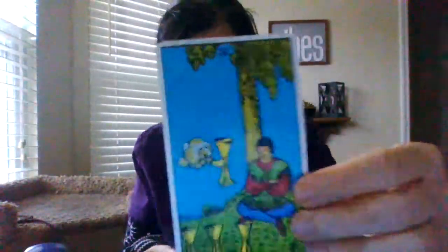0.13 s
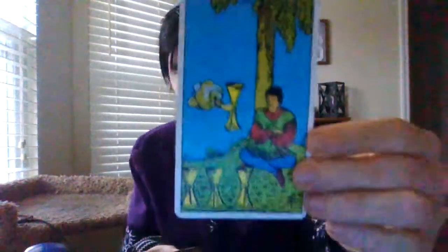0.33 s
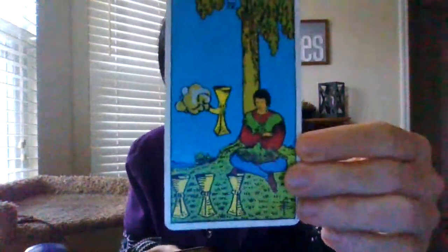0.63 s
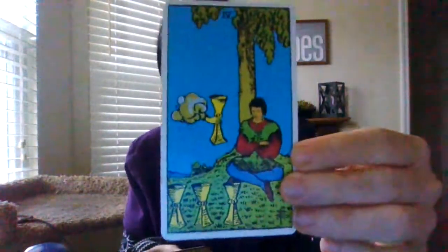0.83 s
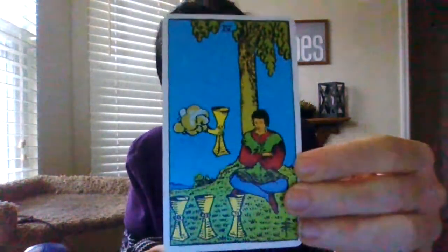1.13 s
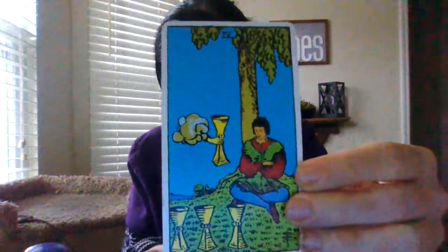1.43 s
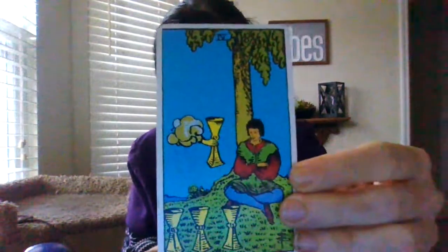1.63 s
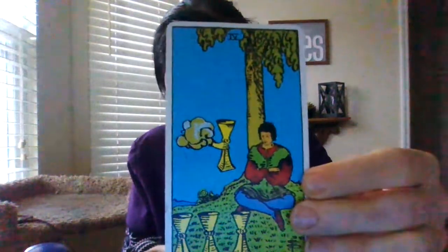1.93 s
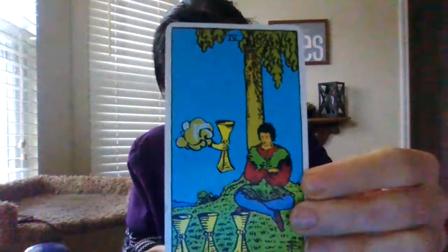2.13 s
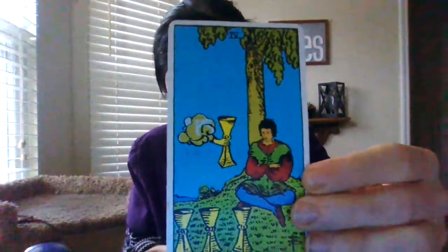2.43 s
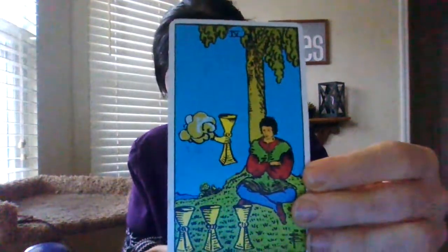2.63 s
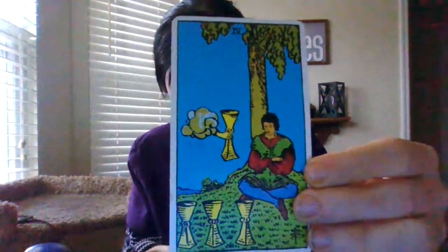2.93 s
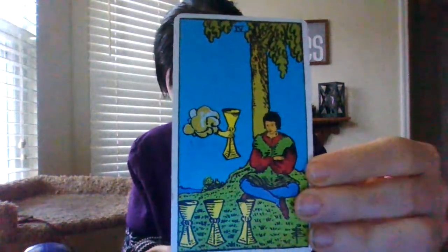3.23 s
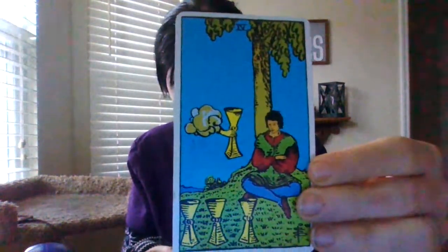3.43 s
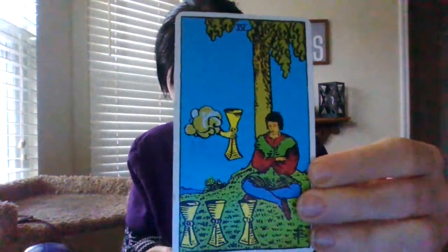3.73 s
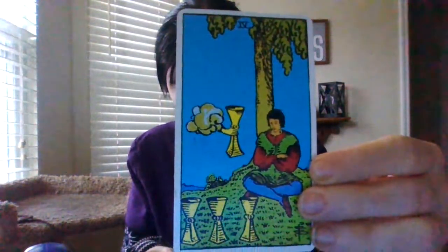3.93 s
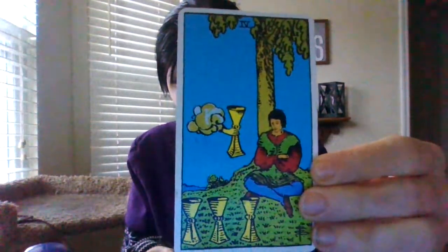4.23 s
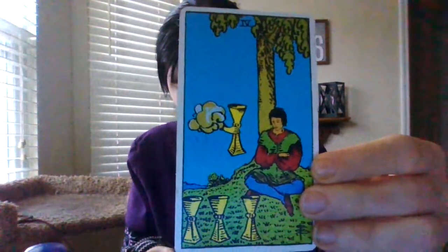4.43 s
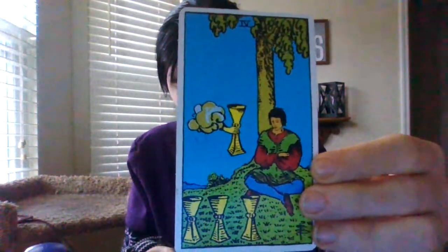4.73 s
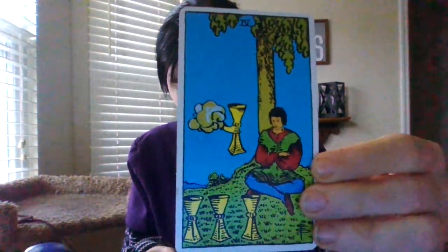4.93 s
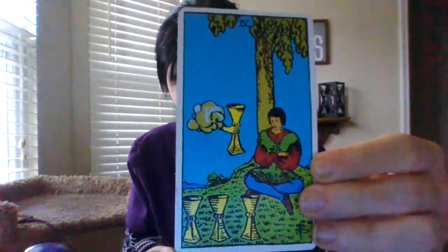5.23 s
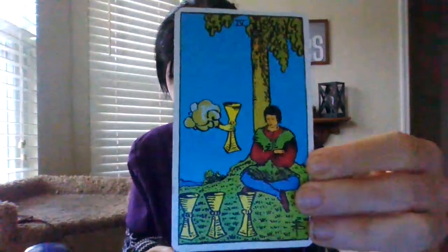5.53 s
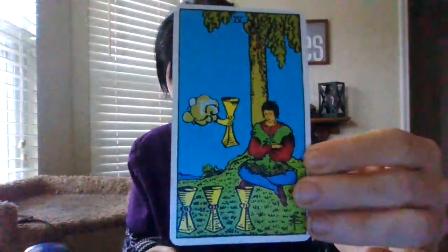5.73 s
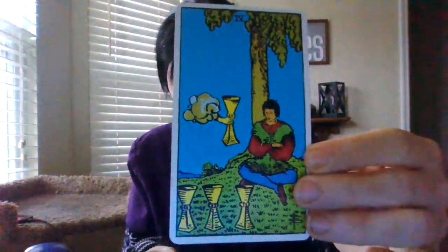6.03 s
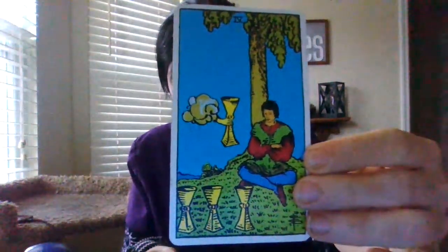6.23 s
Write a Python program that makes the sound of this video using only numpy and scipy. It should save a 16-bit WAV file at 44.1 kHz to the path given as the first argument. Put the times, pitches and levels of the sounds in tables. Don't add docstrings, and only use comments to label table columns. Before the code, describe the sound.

A quiet indoor room heard by a laptop's built-in stereo microphones. From 0 s a vehicle outside is loud and low; around 0.2-0.3 s its pitch falls sharply as it shifts gear, then it pulls away with a slightly shuddering, muffled drone that climbs slowly. Soft tyre hiss and deep thrum are strongest around 1.3-1.9 s and fade by 4 s. Close up, a card taps at 0.1 s, then creaks, rustles and snaps between 0.26 and 0.55 s, with small clicks near 1.0, 1.85, 2.35, 3.1 and 6.04 s. The throttle eases around 2.5-3.5 s, the engine swells again near 4.7 s, rises until 5.4 s, and drops away about 6 s. Throughout, a fan hums with a slow deep air wobble, a disk head makes irregular tiny bright ticks and short rattles, and faint electronic whine and fluttering hiss remain until the end at about 6.4 s.

```python
import sys
import numpy as np
from scipy import signal
from scipy.fft import rfft, irfft, next_fast_len
from scipy.io import wavfile
from scipy.ndimage import uniform_filter1d

SR = 44100
rng = np.random.default_rng(int(sys.argv[2]) if len(sys.argv) > 2 else 0)


def bounce(signal):
    frames = np.transpose(np.atleast_2d(signal))
    limited = np.clip(frames, -1, 1)
    pcm = np.round(limited * 32767).astype(np.int16)
    wavfile.write(sys.argv[1], SR, pcm)


def gain_from_db(level_db):
    decades = np.asarray(level_db, float) / 20
    return 10 ** decades


N = 280784
TIME_S = np.arange(N) / SR
OPPOSED = np.array([[1], [-1]])


def read(points, hz):
    f, value = np.transpose(points)
    return np.interp(np.log(hz + 1), np.log(f + 1), value)


def evened(x):
    return x / np.sqrt(np.mean(x ** 2) + 1e-20)


def curves(rows):
    s, *columns = np.transpose(rows)
    return [np.interp(TIME_S, s, column) for column in columns]


def tone(hz):
    cycles = np.cumsum(hz * np.ones(N)) / SR
    return np.sqrt(2) * np.sin(2 * np.pi * (cycles + rng.random()))


def resonate(x, hz, width_hz):
    turn = np.exp(2j * np.pi * np.cumsum(hz * np.ones(len(x))) / SR)
    r = np.exp(-np.pi * width_hz / SR)
    smooth = signal.lfilter([(1 - r) ** 2], [1, -2 * r, r * r], x / turn)
    return 2 * (turn * smooth).real


def noise(spectrum, likeness, lag=0):
    size = next_fast_len(N)
    hz = np.fft.rfftfreq(size, 1 / SR)
    a, b = rfft(rng.standard_normal((2, size)))
    same = np.clip(read(likeness, hz), -1, 1)
    left = a * np.exp(-2j * np.pi * hz * lag / SR)
    right = same * a + np.sqrt(1 - same ** 2) * b
    return irfft(np.array([left, right]) * gain_from_db(read(spectrum, hz)) * np.sqrt(SR / 2), size)[:, :N]


def add(mix, s, sound):
    part = mix[..., round(s * SR):][..., :sound.shape[-1]]
    part += sound[..., :part.shape[-1]]


# pitch_hz, width_hz, level_db
WALL_MODES = [(40.3, 4, -36.5), (44.7, 3, -30.5), (49.1, 3.6, -30), (59.46, 1.69, -39), (79.7, 14.6, -37.5),
              (91.9, 5.3, -37), (99.7, 2.9, -45), (104.8, 3.6, -52.5), (111.12, 5.66, -41.5),
              (126.5, 11.5, -48.5), (134.7, 6.3, -37.5), (151.1, 5, -44), (168, 13.6, -59.5), (118, 6, -48),
              (189, 10.7, -54), (259.4, 9.6, -58), (328.4, 11, -59)]


def walls_db(hz):
    power = sum(gain_from_db(2 * db) / (1 + (2 * (hz - f) / width) ** 2) ** 2 for f, width, db in WALL_MODES)
    return 10 * np.log10(power)


# time_s, firing_hz, load_db
ENGINE_RUN = [(0, 59.4, 9.5), (.13, 61.4, 7.5), (.22, 53.14, -8.5), (.3, 38.45, -2), (.57, 40.92, 3),
              (1.07, 44.79, -3.5), (1.57, 48.55, 4), (2.07, 51.11, 5), (2.5, 53.2, 4), (2.8, 53.69, 3),
              (3.5, 53.5, 0.5), (4.2, 55.37, 0), (4.7, 56.9, 6.5), (5.4, 60.3, -1), (5.75, 56.75, -1.5),
              (6.0, 51.86, -10), (6.12, 43.88, -10), (6.37, 44.75, -9)]
# multiple of firing, level_db, change_db while coasting, share of load_db followed
STRONG_ORDERS = [(1, -1.75, 1, 1.1), (2, 1.8, -7.5, 1.08), (2.5, -12.5, 4.5, 0.48), (3, 4, 2.5, 0.6),
                 (4, -1, 0, 1.5), (5, -2, 0, 0.5), (6.5, -2, -13, 1)]
# multiple of firing, level_db
WEAK_ORDERS = [(.5, -13.5), (1.5, -24), (3.5, -36)]
# from_s, to_s, ramp_s
COASTING = (2.46, 3.49, 0.091)
# start_s, rate_hz, share of speed, fade_s
DRIVELINE_SHUDDER = (0.33, 3.9, 0.039, 1.8)
# pitch_hz, level_db
RUMBLE_SPECTRUM = [(30, 10.5), (80, 4), (115, -0.5), (150, 6), (190, 1), (215, -1), (300, -25),
                   (450, -26.5), (1200, -23.5), (4000, -73)]
# pitch_hz, likeness 0-1
ROOM_LIKENESS = [(60, 0.95), (150, 0.99), (380, 0.95), (950, 0.85), (1500, 0.57), (2380, 0.012),
                 (5980, 0.55), (15000, 1)]


def engine(lug_hz=43, even_rough=.05, lug_rough=0.14, rumble_db=-24, side_db=-8, ringing_db=-3):
    hz, load_db = curves(ENGINE_RUN)
    ease, resume, ramp = COASTING
    coasting = np.interp(TIME_S, [ease - ramp, ease + ramp, resume - ramp, resume + ramp], [0, 1, 1, 0])
    levels_db = []
    for multiple, db, coast_db, follows in STRONG_ORDERS:
        through_db = np.repeat(walls_db(multiple * hz[::32]), 32)[:N]
        levels_db.append(follows * load_db + db + coasting * coast_db + through_db)
    load = np.sqrt(uniform_filter1d(sum(gain_from_db(2 * db) for db in levels_db), 20000))
    gains = [gain_from_db(db) for db in levels_db] + [load * gain_from_db(db) for _, db in WEAK_ORDERS]
    multiples = [row[0] for row in list(STRONG_ORDERS) + list(WEAK_ORDERS)]

    start, shudder_hz, share, fade = DRIVELINE_SHUDDER
    since = np.maximum(TIME_S - start, 0)
    hz = hz * (1 + share * np.sin(2 * np.pi * shudder_hz * since) * np.exp(-since / fade))
    shake = even_rough + lug_rough * (uniform_filter1d(hz, 4000) < lug_hz)
    orders = np.zeros(N)
    for multiple, gain in zip(multiples, gains):
        uneven = 1 + shake * evened(uniform_filter1d(rng.standard_normal(N), 1500))
        orders += gain * tone(multiple * hz) * uneven

    rumble = gain_from_db(rumble_db) * load ** 0.59 * evened(noise(RUMBLE_SPECTRUM, ROOM_LIKENESS))
    across = gain_from_db(side_db) * resonate(orders, 95.3, 7.0)
    ringing = gain_from_db(ringing_db) * resonate(orders, 59.3, 1.34)
    return orders + ringing + rumble + across * OPPOSED


# pitch_hz, density_db per Hz
TYRE_HISS = [(190, -100), (290, -80.5), (450, -97), (700, -88.5), (1300, -100.5), (2100, -102),
             (3000, -106), (5000, -122)]
# time_s, level_db
NEARNESS = [
    (0, -11),
    (.8, -10.5),
    (1.3, -1),
    (1.9, -3.5),
    (2.6, -7.5),
    (4, -24),
    (6.37, -17),
]


def tyres(thrum_db=-42, thrum_hz=34, width_hz=22):
    near_db, = curves(NEARNESS)
    thrum = gain_from_db(thrum_db) * evened(resonate(rng.standard_normal(N), thrum_hz, width_hz))
    return gain_from_db(near_db) * (noise(TYRE_HISS, ROOM_LIKENESS, lag=3) + thrum)


# start_s, peak_db, low_hz, high_hz
CARD_SNAPS = [(.2735, -56, 1200, 5000), (.279, -56, 900, 3000), (.2965, -54, 1200, 4800),
              (.3972, -41, 3400, 8500), (.3982, -39, 8500, 15500), (1.8485, -45.5, 4300, 8200),
              (1.8485, -50, 13000, 15500), (2.34, -54, 3800, 5200), (2.3395, -50, 1500, 3000),
              (2.3695, -45, 1300, 3300), (3.155, -49, 2900, 4300), (3.0755, -57, 3200, 4300),
              (6.041, -48, 1300, 3000)]


def snaps():
    out = np.zeros(N)
    kick = np.zeros(512)
    kick[[0, 31]] = 1, -.45
    for s, db, low_hz, high_hz in CARD_SNAPS:
        band = signal.butter(2, [low_hz, high_hz], "band", fs=SR, output="sos")
        click = signal.sosfilt(band, kick)
        add(out, s, gain_from_db(db) * click / abs(click).max())
    return out


# start_s, length_s, level_db
FINGER_SLIDE = (.262, .04, -62.5)
# pitch_hz, level_db
SLIDE_BODY = [(600, -30), (1000, 0), (2600, 0), (4500, -8), (8000, -13), (12000, -30)]


def rustle(out):
    start, length, db = FINGER_SLIDE
    size = round(length * SR)
    grain_gain = gain_from_db(4.0 * rng.standard_normal(40).repeat(66))[:size]
    grains = noise(SLIDE_BODY, ROOM_LIKENESS)[0, :size] * grain_gain
    add(out, start, gain_from_db(db) * evened(grains) * signal.windows.tukey(len(grains), .4))


# start_s, peak_db, pitch_hz, t60_s
CARD_TAPS = [(.1025, -45, 1540, .04), (.112, -59, 1470, .3), (.263, -53.5, 1060, .2),
             (.271, -57, 1850, .06), (.272, -58, 2400, .08), (.273, -59, 4400, .07), (.275, -61, 3150, .1),
             (.276, -64, 6900, .1), (.281, -65, 5600, .08), (.289, -60, 2380, .05), (.294, -61, 4350, .04),
             (.3972, -54, 5600, .02), (.3972, -52, 6500, .02), (.397, -43.5, 7400, .035),
             (.4035, -54, 7150, .04), (.45, -56, 1110, .13), (.454, -56, 1840, .08), (.462, -59, 1400, .15),
             (.467, -54, 1830, .08), (.484, -56, 1900, .065), (.515, -57, 1840, .08),
             (.533, -59, 1860, .07), (.728, -59, 1897, .032), (1.0105, -48, 1130, .06),
             (1.8495, -57, 5000, .012), (2.3392, -50, 2450, .016), (2.3392, -51, 1950, .016),
             (2.345, -60, 2527, .18), (2.369, -46, 1904, .02), (2.369, -51, 2600, .02),
             (3.0744, -60, 3720, .031), (3.1547, -58, 3450, .025), (6.0408, -50, 1950, .015),
             (6.0408, -51, 1450, .016), (2.35, -62, 1900, .15)]


def card(rise_s=.0016, struck_s=.07, struck_top=0.7, struck_least=0.15):
    t = np.arange(8192) / SR
    rise = np.sin(np.pi / 2 * np.minimum(t / rise_s, 1)) ** 2
    out = snaps()
    for s, db, hz, t60 in CARD_TAPS:
        width_hz = 0.05 * hz + 120 + 6 / t60
        rubbed = evened(resonate(rng.standard_normal(len(t)), hz, width_hz))
        struck = np.clip(struck_least + struck_top / (1 + (t60 / struck_s) ** 6), 0, 1)
        ring = np.sqrt(2 * struck) * np.sin(2 * np.pi * hz * t) + np.sqrt(1 - struck) * rubbed
        add(out, s, 0.89 * ring * gain_from_db(db - 60 * t / t60) * rise)
    rustle(out)
    return np.array([np.roll(out, 1), out])


# start_s, peak_db, brightness_db
HEAD_TICKS = [(0.1496, -47.5, 6), (0.2433, -46.5, 7), (0.5891, -55, 7), (0.876, -44.5, 15.5),
              (0.9486, -44.5, 7.5), (1.1134, -43.5, 12), (1.282, -62, 1), (1.2958, -41.5, 12),
              (1.4247, -47, 8), (1.4511, -51, 1), (2.0438, -51, 6), (2.378, -46, 7), (2.6693, -47.5, 5.5),
              (2.8145, -48, 14.5), (2.8669, -44, 9), (3.006, -48, 8), (3.3643, -45, 6.5),
              (3.4092, -46.5, 1), (3.6421, -48, 7), (4.185, -46, 11), (4.3196, -44, 10),
              (4.4528, -43.5, 11.5), (4.569, -48, 11), (4.9979, -48, 7), (5.1618, -43, 8),
              (5.446, -50, 5.5), (5.7957, -46, 10), (6.1584, -50, 3), (6.342, -45, 7.5)]
MORE_TICKS = [(.0912, -52, 3), (.196, -51, 7), (.5142, -51, 2), (1.5065, -54, 3), (1.934, -46, 6),
              (2.18, -50, 5), (2.3615, -55, 5), (2.586, -50, 7.5), (2.7472, -47, 3), (3.033, -53, 5),
              (3.1512, -48.5, 5), (3.2605, -51, 8), (3.4935, -49, 10), (3.5848, -50, 6), (4.3435, -52, 5),
              (4.3745, -52, 15), (4.7701, -52.5, 3.5), (4.9821, -55, 8), (5.1851, -45, 14),
              (5.462, -42.5, 11), (5.7269, -54, 5), (5.9155, -55, 3), (6.2692, -51, 0)]
FURTHER_TICKS = [(.0338, -53, 9), (.2835, -48, 4), (.4449, -51, 1), (.5546, -50, 14), (.8829, -49, 7),
                 (.9797, -54, 6), (1.2421, -52, 9), (1.3813, -52, 7), (1.4805, -52, 4), (2.4745, -46, 13),
                 (2.558, -44, 4), (2.7227, -53, -4), (2.9736, -53, 7), (3.0584, -49, 7), (3.3243, -55, 12),
                 (3.8122, -55, 6), (4.0427, -53, 8), (4.2025, -55, 6), (4.3944, -50, 4), (4.6718, -52, 15),
                 (4.806, -53, 8), (5.0749, -53, 7), (5.3457, -56, 4), (5.4914, -53, 3), (5.5712, -48, 6),
                 (6.0277, -51, 5)]
# start_s, peak_db, brightness_db
HEAD_RATTLES = [(.0635, -51.5, 4.5), (0.8128, -56, 0), (1.0538, -52, 8), (1.139, -56, 7), (1.591, -54.5, 2),
                (1.7261, -54, 1), (1.923, -53, 8), (2.131, -51, 11), (2.4655, -59, 22), (2.5459, -52, 6),
                (2.74, -60.5, 8), (2.9037, -52.5, 4.5), (3.142, -52, 11), (4.334, -52, 12),
                (5.171, -45, 6.5), (5.8725, -52, 6.5), (6.252, -58, 0), (6.288, -54, 3)]
# pitch_hz, level_db
TICK_COLOUR = [(5000, -30), (7000, -12), (9000, 0), (12000, 0), (15500, -.5)]


def disk_ticks(seeks_per_s=3, faint_per_s=50, rattle_gap_s=0.002, rattle_fall_db=1.5):
    rattles = [(s + k * rattle_gap_s, db - k * rattle_fall_db, bright_db)
               for s, db, bright_db in HEAD_RATTLES for k in range(3)]
    seeks = [(s * 200 / seeks_per_s, -61.5 + 9.5 * u, 14 * v - 2) for s, u, v in rng.random((200, 3))]
    faint = [(s * 600 / faint_per_s, -66 + 0.51 * u, 16 * v - 5) for s, u, v in rng.random((600, 3))]
    ticks = list(HEAD_TICKS) + list(MORE_TICKS) + list(FURTHER_TICKS) + rattles + seeks + faint
    return [row for row in ticks if row[0] < N / SR]


def disk(rise_s=.0008, t60_s=0.0096, tail_db=-11, tail_t60_s=0.039, gain_db=3, spread=.55):
    t, hz = np.arange(2048) / SR, np.fft.rfftfreq(2048, 1 / SR)
    decay = gain_from_db(-60 * t / t60_s) + gain_from_db(tail_db - 60 * t / tail_t60_s)
    shape = decay * np.minimum(t / rise_s, 1)
    out = np.zeros((2, N))
    for s, db, bright_db in disk_ticks():
        tilt_db = (bright_db - 1.5) * np.clip((hz - 11500) / 4500, -1, 1)
        ripple_db = 3.8 * np.cos(hz / 700 + 2 * np.pi * rng.random())
        colour = gain_from_db(read(TICK_COLOUR, hz) + tilt_db + ripple_db)
        mid, side = irfft(rfft(rng.standard_normal((2, len(t)))) * evened(colour))
        add(out, s, gain_from_db(db + gain_db) * shape * (mid + spread * side * OPPOSED))
    return out


# time_s, level_db
FAN_WOBBLE = [(0.0, -37), (0.19, -28.5), (0.39, -46), (0.53, -31), (1.1, -35), (1.59, -29), (1.74, -41),
              (1.84, -32), (3.03, -26), (3.16, -32), (3.58, -25), (3.71, -37.5), (3.81, -27.5), (4.47, -29),
              (4.77, -32.5), (5.18, -28), (6.28, -34.5), (6.37, -48)]
# multiple of the shaft, level_db, width_hz, steady share 0-1
MOTOR_LINES = [(1, -57, 0.8, 0.53), (4.71, -65, 1.5, 0.4), (5.97, -58, 4.3, 0.56), (7, -65, 1.6, 0.57),
               (8.33, -67, 5.3, 0), (9, -66, 3.7, 0.5), (10.1, -68.5, 7.4, 0.4)]
# top_hz, slide_hz, level_db, beat_s, first_beat_s, depth_db
BLADE_LINE = (396.5, 4.5, -56, 0.561, -0.27, 3.5)


def fan(shaft_hz=39.72, wobble_hz=10.88, wobble_depth=.22):
    level_db, = curves(FAN_WOBBLE)
    drift = evened(uniform_filter1d(rng.standard_normal(N), 9000))
    wobble = tone(wobble_hz * (1 + 0.025 * drift))
    top_hz, slide_hz, blade_db, beat, first, depth_db = BLADE_LINE
    turn = ((TIME_S - first) / beat) % 1
    throb_db = blade_db - depth_db * (2.0 + np.cos(2 * np.pi * turn))
    hum = gain_from_db(throb_db) * tone(top_hz - slide_hz * turn)
    for multiple, db, width_hz, steady in MOTOR_LINES:
        hz = multiple * shaft_hz
        fuzzy = evened(resonate(rng.standard_normal(N), hz, width_hz))
        share = np.clip(steady, 0, 1)
        hum += gain_from_db(db) * (np.sqrt(share) * tone(hz) + np.sqrt(1 - share) * fuzzy)
    return gain_from_db(level_db) * wobble + hum * (1 + wobble_depth * wobble)


# pitch_hz, level_db
WHINE_TONES = [(916, -81), (1005, -74), (12000, -85), (14713, -92)]


def whines():
    return sum(gain_from_db(db) * tone(hz) for hz, db in WHINE_TONES)


# pitch_hz, density_db per Hz
ROOM_AIR = [(2, -56.5), (6, -38.5), (14, -61.5), (22, -57.5), (35, -64), (70, -72), (140, -66.5),
            (200, -89.5), (270, -77), (370, -79), (450, -88), (1100, -92.5), (2200, -100), (5000, -109)]


def room_air():
    return noise(ROOM_AIR, ROOM_LIKENESS, lag=2.4)


# pitch_hz, density_db per Hz
MIC_HISS = [(1000, -114), (4500, -111), (7000, -107), (10000, -105), (15800, -101)]
# pitch_hz, likeness 0-1
HISS_LIKENESS = [(3000, .1), (5000, .2), (8000, .62), (11000, .45), (15000, .2)]


def hiss(depth_db=1.8):
    z = signal.stft(noise(MIC_HISS, HISS_LIKENESS), SR, nperseg=256)[2]
    grain = uniform_filter1d(rng.standard_normal(z.shape[1:]), size=24, axis=0)
    patches = evened(uniform_filter1d(grain, size=7, axis=1))
    return signal.istft(z * gain_from_db(depth_db * patches), SR, nperseg=256)[1][:, :N]


def scene():
    return engine() + tyres() + card() + disk() + fan() + whines() + room_air() + hiss()


# start_s, length_s
WIDE_MOMENTS = [(.132, .03), (.394, .09), (.834, .075), (1.069, .12), (1.235, .055), (1.391, .16),
                (1.709, .03), (2.032, .025), (2.348, .08), (2.734, .025), (2.965, .13), (3.142, .025),
                (3.355, .09), (4.141, .09), (4.312, .1), (4.461, .03), (4.526, .09), (4.973, .11),
                (5.161, .015), (5.459, .08), (5.764, .08), (6.126, .07)]
# since_s, edge_hz
MONO_ABOVE = [(0, 5800), (.04, 5800), (.05, 6350), (.22, 6350), (.24, 7000), (9, 7000)]


def narrow(x):
    mid, side = (x[0] + x[1]) / 2, (x[0] - x[1]) / 2
    hz, t, z = signal.stft(side, SR, nperseg=512)
    start, length = np.transpose(WIDE_MOMENTS)
    end = start + length
    wide = ((t[:, None] > start) & (t[:, None] < end)).any(1)
    since = t[:, None] - end[length > .05]
    edge_hz = np.interp(np.where(since > 0, since, 9).min(1), *np.transpose(MONO_ABOVE))
    power = uniform_filter1d(uniform_filter1d(abs(z) ** 2, 9, 0), 4, 1)
    band_db = 10 * np.log10(power + 1e-20)
    stray = band_db > np.percentile(band_db, 96, axis=1)[:, None]
    kept = wide | stray | (hz[:, None] < edge_hz)
    side = signal.istft(z * kept, SR, nperseg=512)[1][:N]
    return np.array([mid + side, mid - side])


def low_pass(x):
    return signal.sosfilt(signal.butter(12, 16650, fs=SR, output="sos"), x)


def record(dry, open_s=.006, open_share=.6, edge_hz=15790, offset=-.0004):
    opened = dry * np.minimum(open_share + TIME_S / open_s, 1)
    lowpass = signal.firwin(1023, edge_hz, window=("kaiser", 9), fs=SR)
    band = signal.oaconvolve(opened, lowpass[None], "same")
    band += offset - band.mean()
    return low_pass(narrow(band))


dry = scene()
out = record(dry)
bounce(out)
```